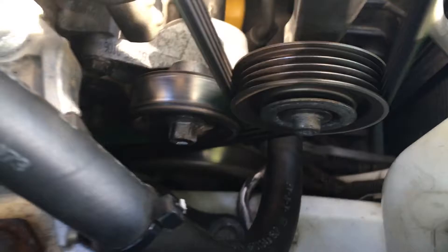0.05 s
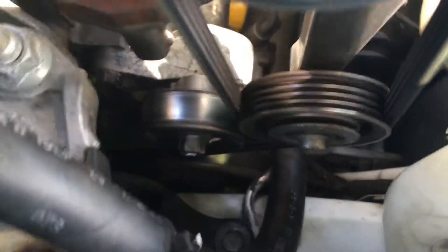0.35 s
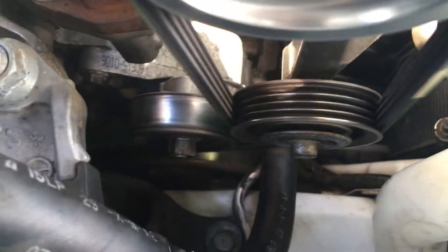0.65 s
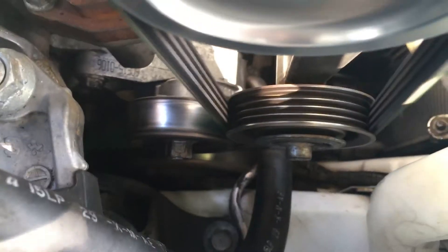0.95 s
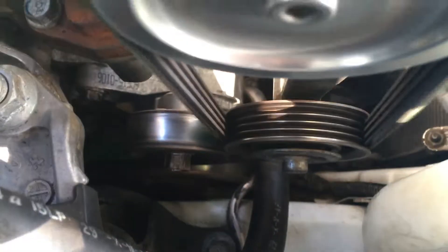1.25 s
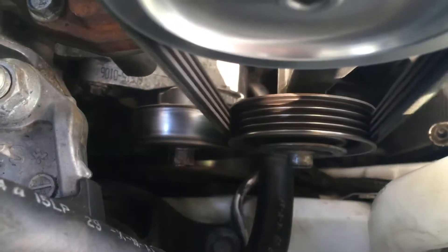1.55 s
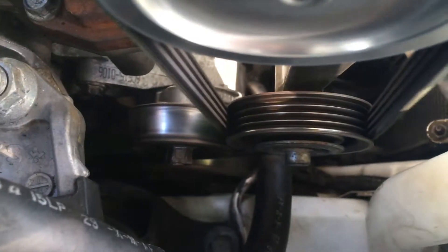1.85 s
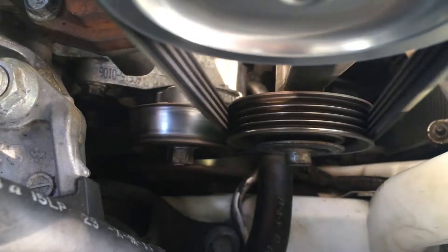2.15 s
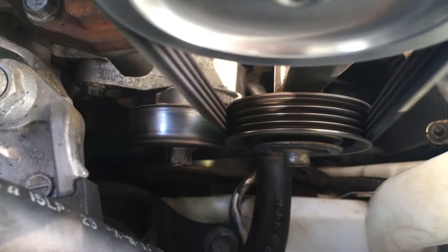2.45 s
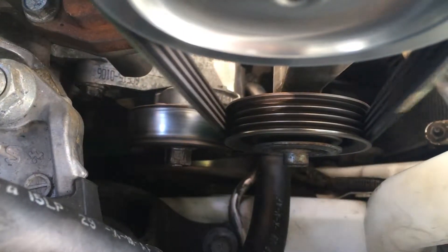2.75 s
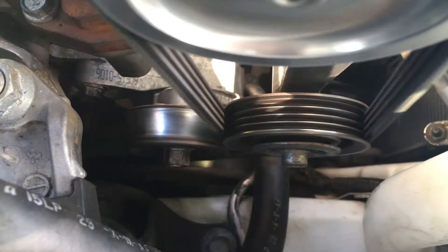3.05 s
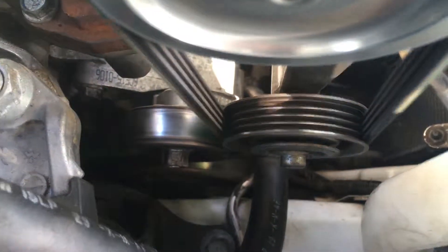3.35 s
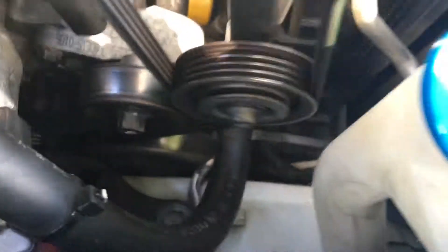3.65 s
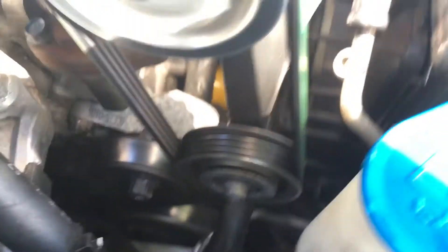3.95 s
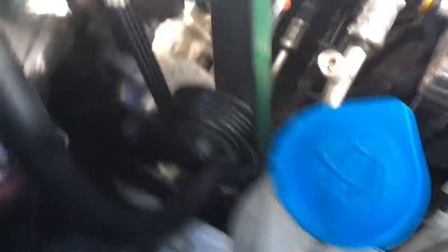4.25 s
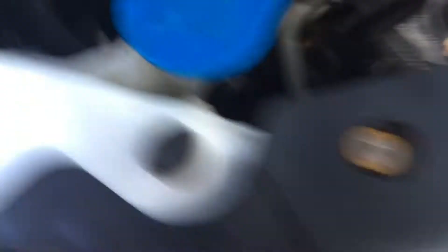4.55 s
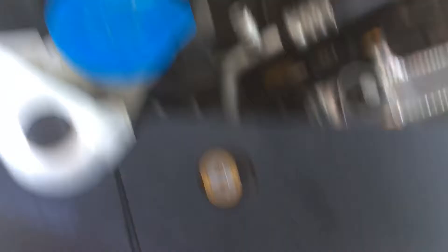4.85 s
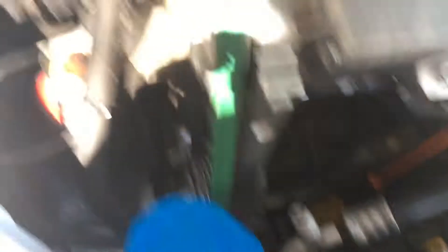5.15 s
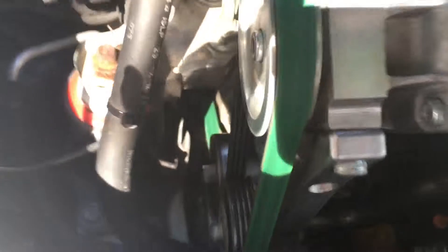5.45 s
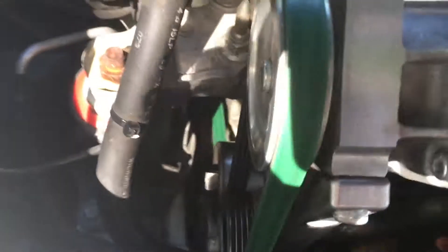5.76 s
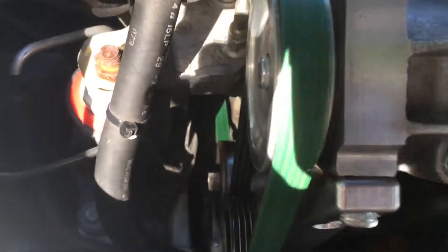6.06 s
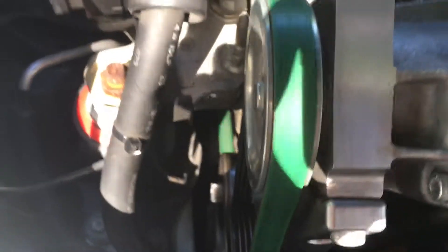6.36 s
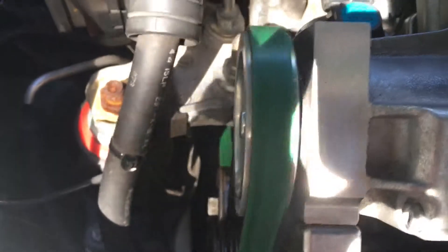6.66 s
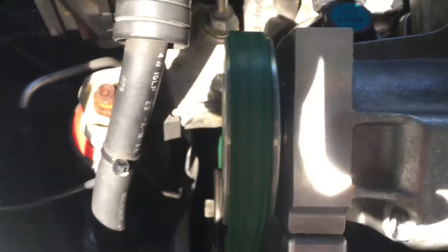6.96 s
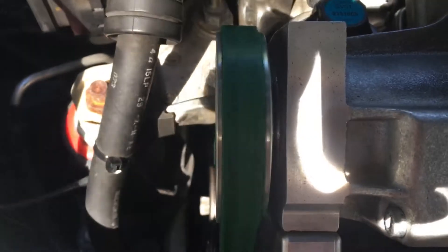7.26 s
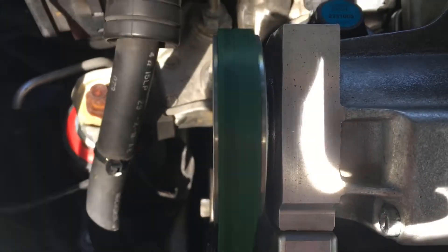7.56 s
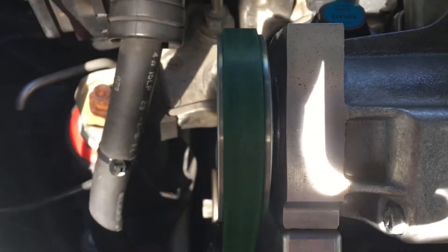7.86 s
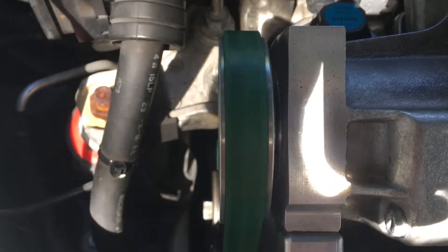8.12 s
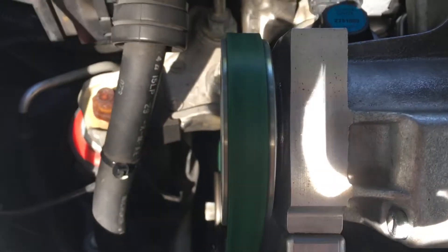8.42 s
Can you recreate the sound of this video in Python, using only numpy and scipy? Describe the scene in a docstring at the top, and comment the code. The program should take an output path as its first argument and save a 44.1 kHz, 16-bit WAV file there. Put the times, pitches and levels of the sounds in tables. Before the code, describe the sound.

A drive belt squeaks in rapid, regular, high-pitched chirps over the hum, clatter and hiss of an idling car engine.

```python
"""Idling engine with a squeaky belt

We listen under an open car bonnet, moving from the pulleys to the alternator. The engine booms,
clatters and ticks as it fires, and its ribbed belt hisses. Once a belt turn, glazed spots slip over
a pulley and chirp near 8 kHz; polished patches on the pulley make some chirps jump up in pitch."""
import sys
import numpy as np
from scipy import signal
from scipy.fft import rfft, irfft, next_fast_len
from scipy.io import wavfile
from scipy.ndimage import uniform_filter1d, minimum_filter1d, map_coordinates

SR = 44100
rng = np.random.default_rng(int(sys.argv[2]) if len(sys.argv) > 2 else 0)


def digitize_waveform(pressure):
    """Quantize a signal to 16-bit integers and store it at the path in sys.argv[1].

    Rows of a 2-D input are taken as channels; values are limited to [-1, 1].
    """
    field = np.atleast_2d(pressure).T
    bounded = np.clip(field, -1, 1)
    quanta = np.round(bounded * 32767).astype(np.int16)
    wavfile.write(sys.argv[1], SR, quanta)


N = 374409

# engine speed: (time [s], firings [per s])
ENGINE_SPEED = [(0.0, 36.62), (0.6, 36.27), (1.1, 36.17), (1.5, 36.98), (1.9, 36.3), (2.4, 36.72),
                (3.0, 36.06), (3.6, 36.68), (4.1, 36.06), (4.6, 36.5), (5.2, 36.12), (5.7, 36.47),
                (6.1, 35.97), (6.7, 36.64), (7.3, 36.04), (8.0, 36.16), (8.49, 36.1)]
# where we listen, and how the front panel shades the higher sounds:
# (time [s], place [0 = pulleys, 1 = alternator], shade [dB])
LISTENER_PATH = [(0, 0.028, 0), (3.4, 0, -0.5), (4.2, 0.17, -1.9), (4.68, 0.71, -4.5), (5.1, 0.98, 0.5),
                 (8.49, 0.93, -0.5)]
# the boom at twice the firing rate, unsteady near the end: (time [s], level [dB])
BOOM_LEVELS = [(0.03, -27), (0.07, -35), (0.43, -25), (0.88, -28.5), (4.81, -27), (4.84, -24),
               (5.68, -23.5), (5.94, -26.5), (6.93, -22.5), (6.98, -30), (7.24, -22), (7.29, -47),
               (7.31, -38), (7.55, -27), (7.62, -48), (7.69, -30), (7.85, -35), (8.02, -24), (8.09, -41),
               (8.32, -23), (8.37, -42), (8.49, -22)]
# the engine's weaker tones: (pitch [times the firing rate], relative level [dB])
WEAK_TONES = [(1, -39), (3, -38.5), (4, -38.5), (5, -58), (7, -47), (8, -50), (12, -55), (15, -51)]
# the tone colour of each noise: (frequency [Hz], relative level [dB])
RUMBLE_COLOUR = [(22, -40), (33, -14), (60, 4.5), (100, 0), (140, -6), (190, 3), (260, -6), (330, -15.5),
                 (600, -32.5)]
BUMP_COLOUR = [(40, -20), (90, -1), (160, -3.5), (260, -9.5), (600, -24), (2000, -51)]
CLATTER_AT_PULLEYS = [(180, -32), (330, -7.5), (420, -3), (480, -16.5), (560, -3.5), (750, -3.5), (1030, 1),
                      (1250, -5), (1450, -7.5), (1650, -6.5), (1900, -7.5), (2500, -6), (3000, -6.5),
                      (3400, -12), (3900, -10), (4800, -19), (6500, -25), (11000, -120)]
CLATTER_AT_ALTERNATOR = [(180, -37), (330, -5.5), (420, -5), (480, -8.5), (600, -1), (750, -3.5),
                         (1000, 0.5), (1250, -0.5), (1450, -5.5), (1600, -0.5), (1900, -6.5), (2200, -5),
                         (2900, -6), (3400, -12), (3900, -10), (4800, -19.5), (6500, -35), (11000, -120)]
TICK_COLOUR = [(2000, -25), (4000, -7.5), (5000, -17), (10500, -14), (12000, -2), (12600, 5), (13200, 9.5),
               (14500, -2), (16000, -30)]
RUB_COLOUR = [(2500, -50), (5100, -16), (5850, -10), (6250, -4.5), (6900, -1), (7600, -13), (9000, -25),
              (12000, -50)]
FIZZ_COLOUR = [(3000, -22), (5000, -4.5), (5900, 4.5), (6800, 3.5), (7800, 2), (9500, 3), (10500, -2),
               (12000, 2.5), (13500, 0), (15700, 4)]
# soft low bumps: (time [s], level [dB])
LOW_BUMPS = [(0.018, -18.5), (0.618, -23), (3.075, -22), (4.646, -28), (5.859, -19.5), (7.32, -20.5),
             (7.613, -21), (8.077, -20.5)]
# the hardest knocks: (time [s], level [dB], pitch [Hz])
BRACKET_CLANKS = [(3.929, -18.5, 990), (5.417, -19, 1610), (5.879, -15, 1603), (6.902, -16.5, 1630)]
# each cylinder's ring, in firing order: (level at the pulleys [dB], level at the alternator [dB])
CYLINDER_RINGS = [(-36.5, -46), (-35, -36.5), (-39.5, -44.5), (-38.5, -42)]
# polished patches on the pulley: (angle [turns], width [turns], polish [0-1])
POLISHED_PATCHES = [(.662, 0.098, 1), (0.0574, 0.0552, 0.2)]
# slipping spots on the belt: (delay from the main chirp [s], level [dB], pitch [Hz],
# pitch jump on polish [Hz], level swing with bite [dB], scrape [dB], scrape swing with bite [dB],
# rise [s], fall [s], pitch roughness [ratio], neighbouring rib [dB], octave [dB])
GLAZED_SPOTS = [(-.0893, -12.3, 7950, 1208, 1, -19.5, 1.5, 0.00074, 0.0039, 0.055, -13.5, -8.5),
                (-.0785, -11, 7850, 900, 1.1, -27, 7, 0.0025, 0.0033, 0.0214, -16.5, -15),
                (-.056, -23.5, 7210, 491, 3.5, -13, 2, 0.0025, 0.0026, 0.065, -16, -11),
                (-.0293, -12.5, 8060, 800, 0, -21.5, 3.5, 0.00082, 0.0034, 0.055, -14, -12),
                (-.0018, -7, 8065, 190, 0, -18, 1.5, 0.0022, 0.0042, 0.018, -11.5, -29),
                (.036, -27.5, 6840, -4, 1, -4, 2, 0.0018, 0.0011, 0.075, -4, -4),
                (-.113, -29, 7120, -7, 1.5, -3, 0, 0.0019, .004, 0.054, -17, -13)]

# base levels: (at the pulleys [dB], at the alternator [dB])
DRONE_DB, RUMBLE_DB, CLATTER_DB, HISS_DB = (-34.5, -32), (-32, -31), (-31.5, -30.5), (-29, -27.5)
DRONE_SWING_DB, RUMBLE_SWING_DB, RUB_SWING_DB = 0.65, 2.5, 4.5  # random swings in level
BAY_FADE_S, CLANK_FADE_S = 0.051, 0.045  # time to fade by 60 dB
KNOCK_HZ = (454, 2273)  # lowest and highest ring of the small knocks
FIRST_CATCH = 3.936  # firings until the main spot first catches
FIRINGS_PER_TURN, PULLEY_PER_TURN = 6.748, 4.719  # firings and pulley turns in one belt turn
BITE_ANGLE = 0.39  # turns; the slightly oval pulley bites hardest here and half a turn later
POLISH_DB = -2  # a squeal that jumps up is weaker
TUG_DB, TUG_AT = 0.8, 0.08  # each firing tugs the belt: level swing, loudest point of the cycle
SCATTER_DB, SCATTER_HZ = 1.3, 88.5  # chance differences from chirp to chirp
TICK_SHADE, CLATTER_SHADE, HISS_SHADE = 1.6, 0.6, 0.59  # times the shade on the squeal
TOP_HZ = 15850


def amp(db):
    """Turn decibels into a gain."""
    return 10 ** (np.asarray(db) / 20)


def unit(x):
    """Scale a sound to an average strength (rms) of 1."""
    return x / np.sqrt(np.mean(x ** 2) + 1e-20)


def curves(rows):
    """Join a table's points: one value per sample for each column after the time."""
    times, *columns = np.transpose(rows)
    return [np.interp(np.arange(N) / SR, times, column) for column in columns]


def between(levels_db, place):
    """A level in dB on the way from the pulleys to the alternator."""
    return levels_db[0] + place * (levels_db[1] - levels_db[0])


def wobble(rate, size=N):
    """A smooth curve through `rate` random points a second."""
    points = rng.standard_normal(int(size * rate / SR) + 4)
    return map_coordinates(points, [np.arange(size) * rate / SR])


def filtered(x, response):
    """Turn each frequency up or down by the gain response(hz)."""
    size = next_fast_len(N + 8192)
    return irfft(rfft(x, size) * response(np.fft.rfftfreq(size, 1 / SR)), size)[:N]


def noise(colour, drive=1):
    """Noise that swells with drive and takes on a tone colour; strength 1."""
    points_hz, db = np.transpose(colour)
    white = drive * rng.standard_normal(N)
    return unit(filtered(white, lambda hz: amp(np.interp(np.log(hz + 1), np.log(points_hz), db))))


def patchy(x, depth_db):
    """Let narrow bands of pitch swell and fade on their own; strength 1."""
    bands = signal.stft(x, nperseg=2048)[2]
    swell = uniform_filter1d(rng.standard_normal(bands.shape), size=3, axis=0)
    swell = unit(uniform_filter1d(swell, size=9, axis=1))
    return unit(signal.istft(bands * amp(depth_db * swell), nperseg=2048)[1][:N])


def add(track, when, sound):
    """Mix a sound into the track, starting at `when` seconds."""
    start = round(when * SR)
    a, b = max(start, 0), min(start + len(sound), N)
    if b > a:
        track[a:b] += sound[a - start:b - start]


def stroke(cycle, at, rise, fall):
    """A quick swell and fade once a firing; timed in fractions of the cycle."""
    age = (cycle - at) % 1
    shape = (1 - np.exp(-age / rise)) * np.exp(-age / fall)
    return shape / shape.max()


def bay_echo(x, wet_db):
    """Add many short echoes off the metal around the belt."""
    t = np.arange(SR // 16) / SR
    tail = rng.standard_normal(len(t)) * amp(-60 * t / BAY_FADE_S) * (t > .0007)
    tail *= amp(wet_db) / np.linalg.norm(tail)
    tail[0] = 1  # the direct sound
    return signal.fftconvolve(x, tail)[:len(x)]


def bumps():
    """Dull bumps that die quickly."""
    push, t = np.zeros(N), np.arange(SR // 4) / SR
    for when, db in LOW_BUMPS:
        add(push, when - .01, amp(db - 60 * t / 0.17) * (1 - np.exp(-t / 0.0013)))
    return push * noise(BUMP_COLOUR)


def boom(cycle, place):
    """The firings make low, wavering tones, fuller near the alternator, over a rumble."""
    def tone(multiple, db):
        return np.sqrt(2) * amp(db + wobble(8)) * np.sin(2 * np.pi * (multiple * cycle + rng.random()))
    boom_db, = curves(BOOM_LEVELS)
    low = tone(2, boom_db - .4)
    drone = tone(6, between(DRONE_DB, place) + DRONE_SWING_DB * wobble(9))
    weak = amp(-1 + 3.2 * place) * sum(tone(round(multiple), db) for multiple, db in WEAK_TONES)
    rumble = amp(between(RUMBLE_DB, place) + RUMBLE_SWING_DB * wobble(9)) * noise(RUMBLE_COLOUR)
    return low + drone + weak + rumble


def knocks():
    """Many small random blows, each ringing a bracket or cover for a moment; strength 1."""
    out, t = np.zeros(N), np.arange(SR // 20) / SR
    low, high = KNOCK_HZ
    for when, part, force in rng.random((900, 3)):
        hz = low * (high / low) ** (part ** .75)
        add(out, when * N / SR, amp(20 * force ** 2 - 60 * t / 0.033) * np.sin(2 * np.pi * hz * t))
    return unit(out)


def clatter(cycle, place):
    """The valves and engine block clatter unevenly; the colour depends on where we listen."""
    beat = 1 + 0.39 * stroke(cycle, 0.045, 0.036, 0.067) + 0.11 * stroke(cycle, 0.4212, 0.015, 0.069)
    drive = beat * amp(1.7 * wobble(260))
    pulleys = np.sqrt(1 - place) * amp(0.3) * noise(CLATTER_AT_PULLEYS, drive)
    alternator = np.sqrt(place) * amp(1) * noise(CLATTER_AT_ALTERNATOR, drive)
    body = amp(1.54) * patchy(pulleys + alternator, depth_db=2)
    rattle = amp(-11.5 + 1.7 * place) * beat * knocks()
    return amp(between(CLATTER_DB, place)) * (body + rattle)


def clanks():
    """Single harder knocks on a bracket, each a rough, short ring."""
    out, t = np.zeros(N), np.arange(SR // 16) / SR
    for when, db, hz in BRACKET_CLANKS:
        phase = 2 * np.pi * np.cumsum(hz * (1 + 0.11 * wobble(840, len(t)))) / SR
        shape = amp(db + 0.5 - 60 * t / CLANK_FADE_S) * (1 - np.exp(-t / 0.0011))
        add(out, when, shape * np.sin(phase))
    return out


def ticking(cycle, place):
    """Each firing gives a short ring that sinks in pitch and a bright tick; one cylinder stands out."""
    count, age = np.divmod(cycle - .82, 1)
    cylinder_db = np.array(CYLINDER_RINGS)[count.astype(int) % len(CYLINDER_RINGS)].T
    hz = 2820 * np.exp(-.6 * age) + 70 * wobble(600)
    shape = np.sin(np.pi * np.minimum(age / .42, 1) ** .7) ** 1.5
    ring = unit(np.sin(2 * np.pi * np.cumsum(hz) / SR) * shape)
    ring *= amp(between(cylinder_db, place) + 0.25 * wobble(50))
    tick = noise(TICK_COLOUR, stroke(cycle, 0.873, 0.062, 0.13) * amp(1.6 * wobble(40)))
    return bay_echo(ring, wet_db=-6) + amp(-40 + 0.78 * place) * tick


def hiss(place):
    """The belt's ribs rub in the pulley grooves, louder near the alternator."""
    rub = noise(RUB_COLOUR, amp(RUB_SWING_DB * wobble(60)))
    fizz = noise(FIZZ_COLOUR, amp(1.9 * wobble(300) + 1.47 * wobble(45)))
    return amp(between(HISS_DB, place)) * patchy(fizz, depth_db=4.0) + amp(-38 + 3.3 * place) * rub


def pulley(angle):
    """How polished the pulley is (0 to 1) and how hard it bites (-1 to 1) at an angle in turns."""
    polish = 0
    for centre, width, shine in POLISHED_PATCHES:
        distance = (angle - centre + .5) % 1 - .5
        polish += shine * np.exp(-.5 * (distance / width) ** 2)
    return polish, np.cos(2 * np.pi * 2 * (angle - BITE_ANGLE))


def chirp(t, hz, scrape_db, rise, fall, rough, rib_db, octave_db):
    """One slip: the rubber scrapes, catches, squeals and lets go; strength 1 at its height."""
    def grip(lead):
        return np.exp(-.5 * ((t + lead) / np.where(t + lead < 0, rise, fall)) ** 2)
    settle = 1 - np.tanh((t + 0.5 * rise) / 0.00087)  # the pitch starts a little high
    phase = 2 * np.pi * np.cumsum(hz * (1 + 0.01028 * settle + rough * wobble(1291, len(t)))) / SR
    tone = np.sin(phase) + amp(octave_db) * np.sin(2 * phase)
    squeal = grip(0) * amp(2.14 * wobble(780, len(t))) * tone
    # a neighbouring rib starts earlier and sings a higher, unsteady note
    rib_hz = 9050 * (1 + 0.0494 * wobble(930, len(t)))
    rib_grip = np.maximum(grip(0.95 * rise), grip(-rise))
    rib = amp(rib_db) * rib_grip * np.sin(2 * np.pi * np.cumsum(rib_hz) / SR)
    # the first contact is a short, bright scrape
    scrape = amp(scrape_db) * np.exp(-np.abs(t + 0.53 * rise) / 0.0023) * rng.standard_normal(len(t))
    scrape = signal.sosfilt(signal.butter(4, 3800, "high", fs=SR, output="sos"), scrape)
    sound = bay_echo(squeal + rib + 1.75 * scrape, wet_db=-3.5)
    height = sound[(t > -rise) & (t < 2 * fall)]
    return sound / np.sqrt(np.mean(height ** 2))


def belt_chirps(cycle):
    """Each belt turn brings the same spots to the pulley; where they meet it sets pitch and harshness."""
    out, clock = np.zeros(N), np.arange(N) / SR
    t = np.arange(-SR // 64, SR // 16) / SR
    turns = (cycle - FIRST_CATCH) / FIRINGS_PER_TURN
    for turn_start in np.interp(np.arange(int(turns[-1]) + 1), turns, clock):
        for delay, db, hz, jump_hz, bite_db, scrape_db, harsh_db, rise, *slip in GLAZED_SPOTS:
            when = turn_start + delay
            polish, bite = pulley(PULLEY_PER_TURN * np.interp(when - rise, clock, turns))
            pitch = hz + jump_hz * polish + SCATTER_HZ * rng.standard_normal()
            tug = np.cos(2 * np.pi * (np.interp(when, clock, cycle) - TUG_AT))
            db += POLISH_DB * polish + bite_db * bite + TUG_DB * tug + SCATTER_DB * rng.standard_normal()
            add(out, when + t[0], amp(db) * chirp(t, pitch, scrape_db + harsh_db * bite, rise, *slip))
    return out


def scene():
    """Belt and engine from close by; the front panel briefly shades the higher sounds."""
    cycle = np.cumsum(curves(ENGINE_SPEED)[0]) / SR  # firings so far
    place, shade_db = curves(LISTENER_PATH)
    place = np.clip(place, 0, 1)
    belt = amp(shade_db) * belt_chirps(cycle) + amp(HISS_SHADE * shade_db) * hiss(place)
    ticks = amp(TICK_SHADE * shade_db) * ticking(cycle, place)
    metal = amp(CLATTER_SHADE * shade_db) * (clatter(cycle, place) + clanks())
    return (belt + ticks + metal + boom(cycle, place) + bumps())[None]


def record(dry):
    """A limiter turns down peaks that would pass full scale; then the highest treble is cut off."""
    needed = np.minimum(1, 1 / (np.abs(dry[0]) + 1e-9))
    gain = uniform_filter1d(minimum_filter1d(needed, size=200), size=150)
    return filtered(dry[0] * gain, lambda hz: hz < TOP_HZ)[None]


dry = scene()
out = record(dry)
digitize_waveform(out)
```